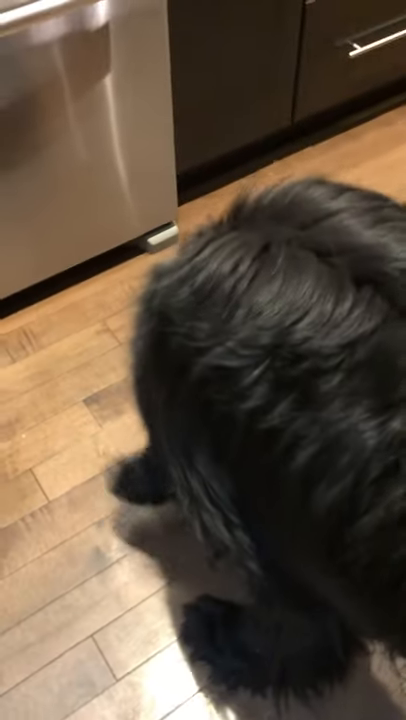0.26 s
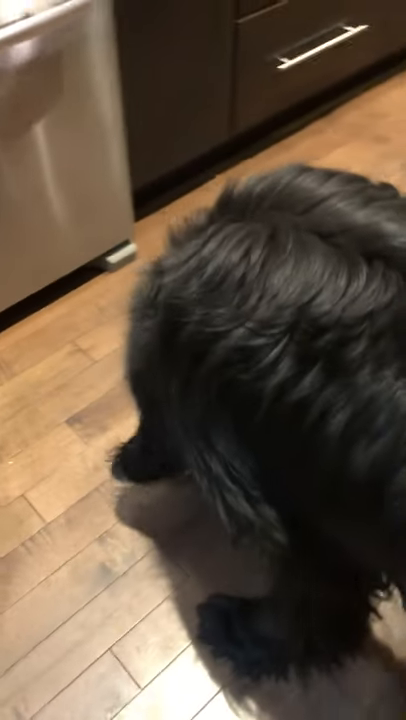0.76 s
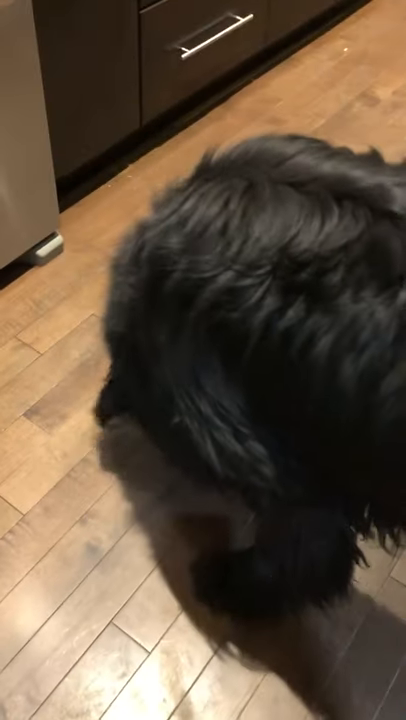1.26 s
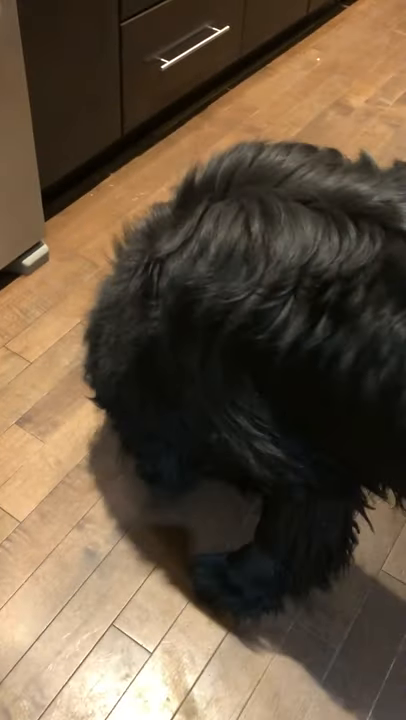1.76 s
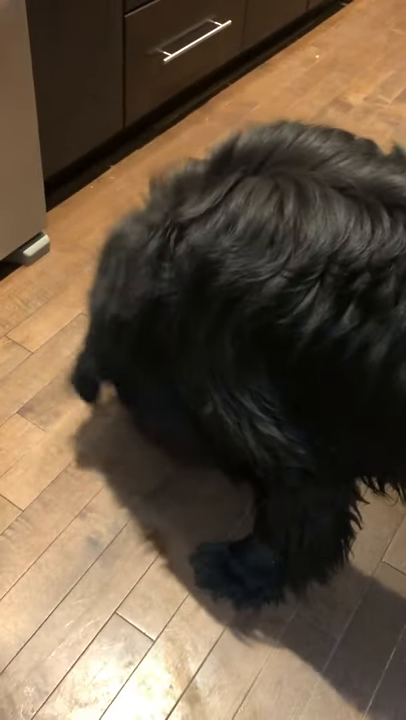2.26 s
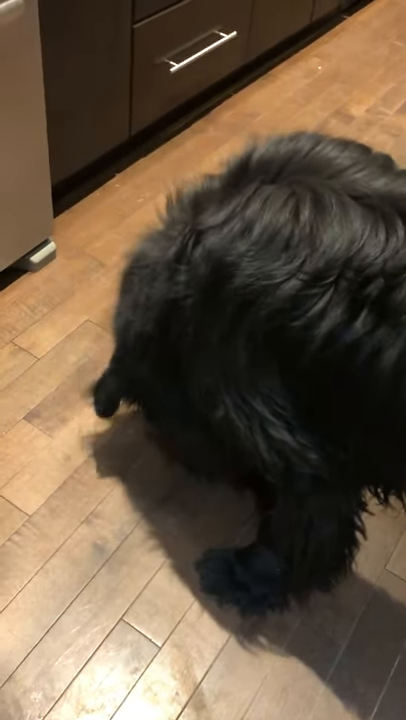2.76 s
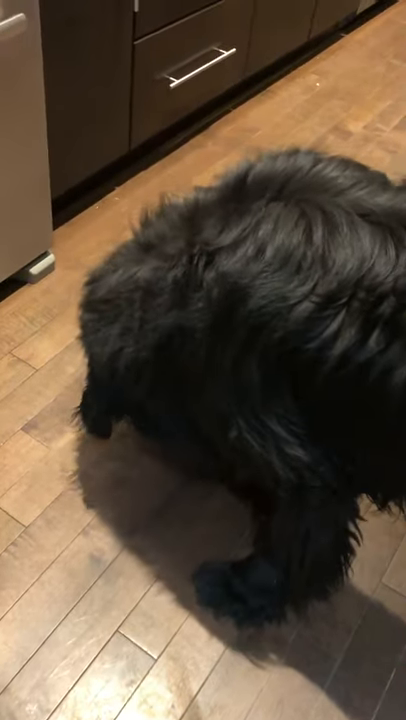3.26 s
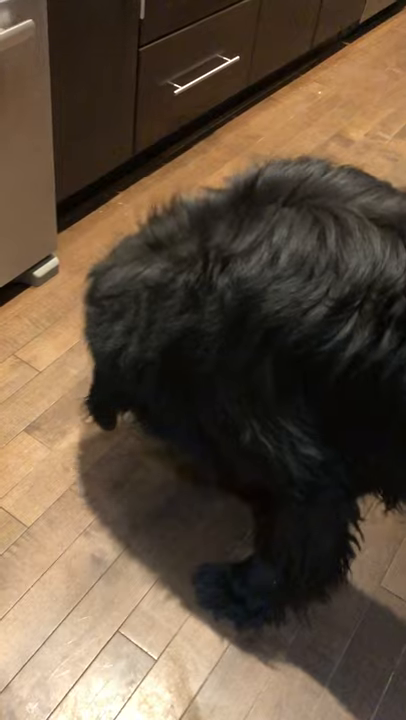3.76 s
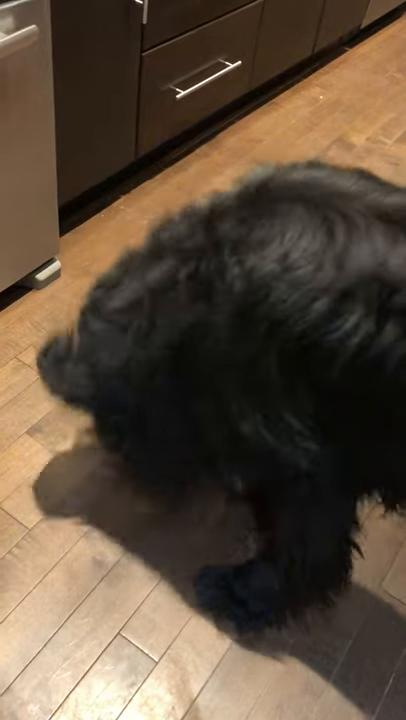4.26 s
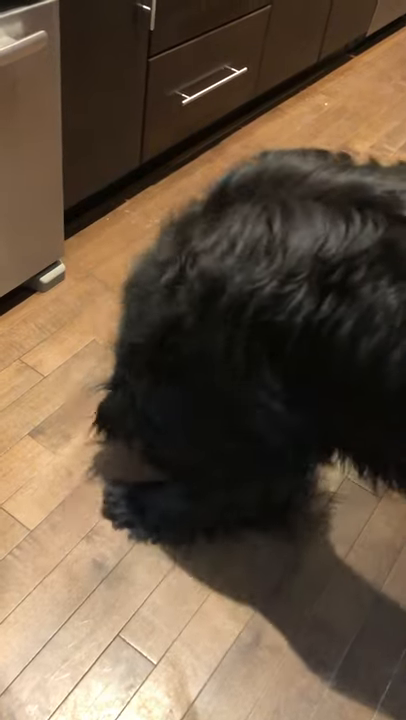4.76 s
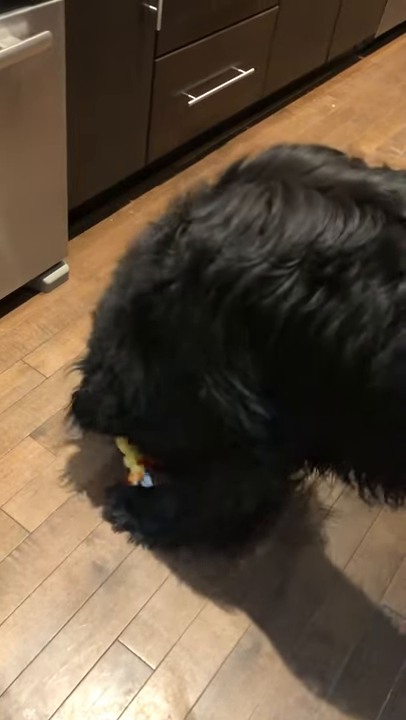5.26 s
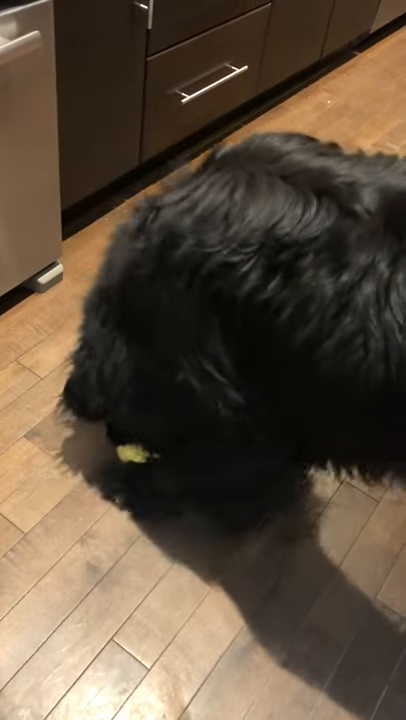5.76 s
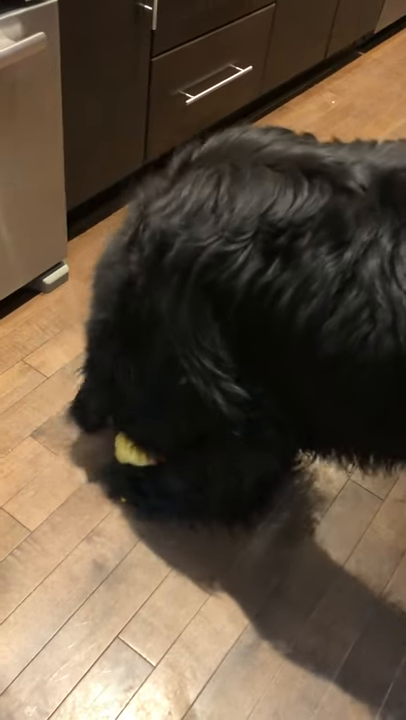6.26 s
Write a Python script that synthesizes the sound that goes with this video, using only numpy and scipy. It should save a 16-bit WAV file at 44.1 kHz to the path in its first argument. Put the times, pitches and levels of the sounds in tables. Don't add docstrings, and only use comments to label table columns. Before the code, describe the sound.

A rubber squeaker toy is worked by a dog just below the microphone on a kitchen's wooden floor. Soft swishes and bumps surround a slow squeak and a quick one, both with an inward wheeze after. Later come a solid thud, ticking claws and a very sharp tooth crack, then the hardest squeak, overblown on release, and hollow toy knocks over low fridge hum, with short bright room echo.

```python
import sys
import numpy as np
from scipy import signal
from scipy.fft import rfft, irfft, next_fast_len
from scipy.io import wavfile
from scipy.ndimage import uniform_filter1d, map_coordinates

SR = 44100
rng = np.random.default_rng(int(sys.argv[2]) if len(sys.argv) > 2 else 0)


def put_to_file(sound):
    columns = np.atleast_2d(sound).T
    safe = np.clip(columns, -1, 1)
    whole_steps = np.round(safe * 32767)
    wavfile.write(sys.argv[1], SR, whole_steps.astype(np.int16))


def voltage_ratio(level):
    return 10 ** (np.asarray(level, float) / 20)


N = 286633

# pitch_hz, level_db (per Hz)
ROOM_AIR = [(15, -54.5), (25, -21), (45, -4.5), (208, -4), (288, -12.5), (410, -12.5), (445, -9),
            (510, -17.5), (568, -15), (617, -16), (687, -16.5), (2270, -30), (3230, -33.5), (3700, -34),
            (16500, -49.5)]
ROOM_AIR_DB = -61
# pitch_hz, wander_hz, level_db
FRIDGE_TONES = [(449.6, 1.2, -66.5), (493, 6, -79.5), (3200, 9.4, -81.5), (3160, 20, -89.5)]
# pitch_hz, t60_s
KITCHEN_DECAY = [(100, 0.32), (1000, 0.74), (4000, 0.66), (8000, 0.4), (15000, 0.27)]
# pitch_hz, level_db (per Hz)
SWISH_COLOUR = [(530, -46), (900, -7), (1220, -6.5), (2660, -5.5), (3830, -5), (4220, -4), (15000, -19),
                (15900, -13.5), (16500, -33)]
# pitch_hz, level_db (per Hz)
DRAG_COLOUR = [(88, -20.5), (150, -12.5), (195, -12), (468, -11.5), (802, -23), (1500, -21.5),
               (1950, -53.5), (3300, -120)]
# start_s, strongest_s, end_s, swish_db, drag_db
FLOOR_STROKES = [(0, -0.006, 0.21, -63, -64), (0.187, 0.313, .33, -58.5, -68),
                 (.432, 0.446, 0.46, -59, -48.5), (.45, .49, 0.55, -62.5, -49.5),
                 (0.43, .53, 0.88, -58.5, -64.5), (1.12, 1.254, 1.41, -57.5, -63),
                 (1.289, 1.489, 1.6, -51, -67), (1.64, 1.707, 2.35, -68, -59.5),
                 (4.071, 4.097, 4.15, -58, -56), (4.221, 4.239, 4.35, -59.5, -54),
                 (4.328, 4.35, 4.41, -64, -59.5), (4.414, 4.424, 4.5, -63.5, -67.5),
                 (4.459, 4.51, 4.545, -58.5, -60.5), (4.54, 4.556, 6, -75, -71),
                 (4.95, 4.975, 5.04, -68, -58), (5, 5.012, 5.12, -74, -54.5)]
# start_s, peak_db, pitch_hz, t60_s
LANDINGS = [(0.21, -41, 98, 0.078), (0.481, -49, 89, 0.14), (1.295, -41.5, 86, 0.095),
            (2.04, -40.5, 118, 0.068), (3.541, -47, 99, 0.068), (3.883, -39, 144.3, 0.04),
            (3.893, -19.5, 135.5, 0.034), (4.292, -34, 107.3, 0.087), (4.346, -45, 91.5, 0.14),
            (4.647, -30, 153, 0.075), (4.66, -26.5, 99.6, 0.08), (4.74, -40, 76.8, 0.13),
            (5.792, -40, 120.3, 0.074), (5.884, -41, 115, 0.061)]
# start_s, peak_db, centre_hz
CLAW_TICKS = [(0.436, -44, 2500), (1.66, -61, 11000), (2.506, -61, 3000), (3.506, -56, 6000),
              (3.882, -47, 10970), (4.01, -63, 6000), (4.089, -42, 4500), (4.117, -44, 5000),
              (4.154, -51, 9000), (4.169, -53, 9030), (4.228, -58, 7040), (4.249, -41, 2500),
              (4.365, -51, 7000), (4.397, -52.5, 11000), (4.427, -52, 5000), (4.469, -54, 11200),
              (4.515, -55, 6960), (5.745, -52, 10000), (5.985, -55, 10420), (6.12, -60.5, 10040),
              (6.133, -60, 8990)]
# start_s, peak_db, centre_hz, spread_octaves
TOOTH_SNAPS = [(3.882, -31, 2940, .5), (3.883, -27.5, 1300, 1.07), (4.078, -40.5, 3200, 0.35),
               (4.279, -46.5, 4500, 0.44), (4.478, -42.5, 2500, 0.74), (4.492, -34, 3200, 0.77),
               (4.632, -8.5, 4500, 0.77), (4.639, -19, 4970, 1.14), (4.648, -36, 4500, 0.73),
               (5.729, -15, 3000, 0.93), (6.47, -58, 4800, .2), (6.494, -39.5, 4000, 0.32)]
# start_s, peak_db, ring_hz, t60_s
TOY_KNOCKS = [(.439, -38, 264, .03), (0.467, -46, 1310, .015), (.468, -40.5, 340, .04),
              (1.272, -41, 617, 0.052), (1.273, -46, 1514, 0.019), (1.708, -47.5, 495, 0.045),
              (2.03, -38.5, 589, 0.026), (2.051, -48, 322, 0.14), (2.11, -48.5, 330, 0.14),
              (3.534, -60, 599, 0.043), (3.89, -36, 1000, 0.084), (4.215, -46, 1200, .02),
              (4.634, -27, 1180, 0.056), (4.65, -42.5, 525, .055), (5.005, -38, 1340, .021),
              (5.006, -30.5, 605, 0.02), (5.53, -44, 603, 0.099), (5.73, -28.5, 880, 0.036),
              (5.734, -40, 448, 0.035), (5.782, -27, 485, 0.024), (5.801, -37, 340, 0.051),
              (5.868, -32, 1100, 0.019), (5.887, -37, 327, 0.15), (5.889, -40.5, 545, .038),
              (6.214, -50, 1380, 0.031)]
# start_s, peak_db, centre_hz, t60_s
BREATH_WHINES = [
    (.01, -63.5, 2040, 1.1),
    (1.381, -50.5, 3660, .59),
    (1.7, -58, 2040, 1.1),
]
# time_s, reed_pitch_hz, level_db
BITE_SQUEAKS = [
    [(.596, 1214, -43.5), (.604, 1305, -34), (.63, 1335, -30), (.68, 1362, -27.5), (.748, 1372, -24),
     (.774, 1344, -28.5), (.8, 1220, -38)],
    [(1.842, 1254, -30.5), (1.848, 1325, -29.5), (1.872, 1361, -24.5), (1.898, 1345, -25.5),
     (1.93, 1242, -31.5), (1.945, 1187, -35.5)],
    [(5.164, 1184, -42), (5.174, 1304, -29), (5.238, 1440, -27), (5.272, 1408, -27), (5.3, 1422, -23.5),
     (5.378, 1500, -21.5), (5.418, 1447, -22.5), (5.435, 1388, -29.5), (5.46, 1260, -35.5)],
]
# time_s, reed_pitch_hz, level_db
RELEASE_SQUEAKS = [
    [(.808, 1226, -38), (.83, 1469, -30), (.85, 1497, -30), (.876, 1460, -31), (.895, 1409, -30.5),
     (.908, 1322, -30), (.94, 1257, -34.5), (.97, 1182, -38), (.99, 1053, -52)],
    [(2.039, 1163, -45), (2.046, 1223, -39.5), (2.08, 1249, -36.5), (2.108, 1292, -35), (2.14, 1255, -37.5),
     (2.155, 1209, -40), (2.172, 1113, -37)],
    [(5.47, 1344, -36), (5.49, 1600, -20.5), (5.499, 2379, -25), (5.553, 2291, -25), (5.563, 1977, -21),
     (5.574, 1903, -28.5), (5.586, 1514, -24), (5.625, 1371, -30), (5.695, 1162, -41)],
]
# pitch_hz, level_db
REED_OUTWARD = [(1200, 6.5), (2700, -4.5), (4100, 0), (5500, 0.5), (7000, 2), (8500, -6.5), (11000, -12.5),
                (13500, -19), (16000, -25)]
# pitch_hz, level_db
REED_INWARD = [(1200, 10), (2700, 0), (4100, -2), (5500, 4), (7000, 0), (8500, -0.5), (11200, -2.5),
               (12200, -23.5), (16000, -15.5)]
# resonance_hz, width_hz, gain_db
TOY_CAVITY = [(7096, 910, 12), (3000, 740, 1), (7055, 2490, 15.5), (6000, 3700, 0), (5840, 2600, 15),
              (5360, 1800, 11)]
# first_partial_db, second_partial_db, third_partial_db, top_db
MOUTH_OPENING = [(-2, -5.5, -4.5, 2.5), (-2, 3.2, -0.5, 2.1), (0.6, 2, -6, 6.5), (-2.5, 1.6, 2.9, 4.5),
                 (3.2, 2.1, 0.3, -2.5), (8.5, 4.5, 4.5, 0.7)]


def unit(x):
    return x / np.sqrt(np.mean(x ** 2) + 1e-20)


def along(points, hz):
    f, v = np.transpose(points)
    return np.interp(np.log(hz + 1), np.log(f + 1), v)


def wobble(rate, size=N):
    knots = rng.standard_normal(int(size * rate / SR) + 4)
    return map_coordinates(knots, [np.arange(size) * rate / SR])


def shaped(x, gain):
    m = next_fast_len(len(x), True)
    return irfft(rfft(x, m) * gain(np.fft.rfftfreq(m, 1 / SR)), m)[:len(x)]


def noise(gain, size=N):
    return unit(shaped(rng.standard_normal(size), gain))


def add(track, s, x):
    part = track[round(s * SR):][:len(x)]
    part += x[:len(part)]


def ambience():
    level = voltage_ratio(ROOM_AIR_DB + 1.5 + 0.17 * wobble(4.1))
    out = level * noise(lambda f: voltage_ratio(along(ROOM_AIR, f)))
    for hz, wander_hz, db in FRIDGE_TONES:
        phase = 2 * np.pi * np.cumsum(hz + wander_hz * wobble(28)) / SR
        out += voltage_ratio(db + 0.5 + 1.0 * wobble(12)) * np.sin(phase)
    return out


def echoes():
    hz, t, z = signal.stft(rng.standard_normal(SR // 2), SR, nperseg=256)
    decay_db = -60 * t / along(KITCHEN_DECAY, hz)[:, None]
    near_walls_db = 1.8 * np.exp(-t / .03)
    tail = signal.istft(z * voltage_ratio(decay_db + near_walls_db), SR, nperseg=256)[1]
    tail = tail * np.minimum(np.linspace(5, 0, len(tail)), 1)
    return tail / np.linalg.norm(tail)


def kitchen(x, wet_db):
    return x + voltage_ratio(wet_db) * signal.fftconvolve(x, np.pad(echoes(), (130, 0)))[:N]


def scuffs():
    t, out = np.arange(N) / SR, np.zeros(N)
    catches = 3.0 * rng.exponential(size=N) * (rng.random(N) < .02)
    grains = voltage_ratio(catches) * voltage_ratio(1.1 * wobble(70))
    swish = unit(shaped(grains * rng.standard_normal(N), lambda f: voltage_ratio(along(SWISH_COLOUR, f))))
    drag = unit(voltage_ratio(3.72 * wobble(60)) * noise(lambda f: voltage_ratio(along(DRAG_COLOUR, f))))
    for start, peak, end, swish_db, drag_db in FLOOR_STROKES:
        span = slice(max(int(start * SR), 0), int(end * SR))
        press = np.interp(t[span], [start, peak, end], [0, 1, 0]) ** 0.99
        out[span] += press * (voltage_ratio(swish_db) * swish[span] + voltage_ratio(drag_db) * drag[span])
    return out


def thuds():
    out, t = np.zeros(N), np.arange(SR // 3) / SR
    for s, db, hz, t60 in LANDINGS:
        sagging = np.sin(2 * np.pi * hz * t * (1 - 3.8 * np.minimum(t, .1)))
        ring = sagging + 0.36 * np.sin(2 * np.pi * 1.7 * hz * t)
        add(out, s, voltage_ratio(db + 3.0 - 60 * t / t60) * (1 - np.exp(-t / 0.0053)) * ring)
    return out


def contacts():
    ticks = [(s, db, hz, 0.62, 0.015) for s, db, hz in CLAW_TICKS]
    snaps = [(*row, 0.018) for row in TOOTH_SNAPS]
    knocks = [(s, db, hz, .5 * (hz / 1000), t60) for s, db, hz, t60 in TOY_KNOCKS]
    whines = [(s, db, hz, .1, t60) for s, db, hz, t60 in BREATH_WHINES]
    return ticks + snaps + knocks + whines


def clicks():
    out, t = np.zeros(N), np.arange(SR // 4) / SR
    bounce_s, bounce = .00094, .3
    lead = SR // 50
    for s, db, hz, octaves, t60 in contacts():
        def colour(f):
            body = np.exp(-.5 * (np.log2((f + 1) / hz) / octaves) ** 2)
            return body * (1 + bounce * np.cos(2 * np.pi * f * bounce_s))

        ring = 1.2 * (hz < 1600) * np.exp(-(octaves / 1.2) ** 2) * np.sin(2 * np.pi * hz * t)
        envelope = voltage_ratio(db - 4.0 - 60 * t / t60) * (1 - np.exp(-t / 0.0005))
        crack = envelope * (0.88 * noise(colour, size=len(t)) + ring)
        tail = shaped(np.pad(echoes(), lead), lambda f: colour(f) / (1 + (f / 6000) ** 2))[lead:]
        tail_level = voltage_ratio(-4.5 - 1.2 * np.log2(hz / 1000)) * np.linalg.norm(crack)
        add(out, s, crack)
        add(out, s + .004, tail_level * tail / np.linalg.norm(tail))
    return out


def roughness(t, hz, slip, inward):
    settle_s = .012
    edges = .15 * np.exp((t[0] - t) / (2 * settle_s)) + .35 * np.exp((t - t[-1] - 1 / SR) / settle_s)
    overblown_hz = 1700
    strain = .27 * np.clip(hz / overblown_hz * 5 - 4.5, 0, 1)
    return np.clip(.02 + .1 * inward + edges + strain + slip, 0, .92)


def squeak(rows, inward, cavity, mouth):
    peak_hz, width_hz, peak_db = cavity
    first_db, second_db, third_db, top_db = mouth
    s, hz, db = np.transpose(rows)
    t = np.arange(s[0], s[-1], 1 / SR)
    k = np.arange(1, 15)[:, None]

    def smooth(v):
        return uniform_filter1d(np.interp(t, s, v), size=120, mode="nearest")

    def colour(f):
        resonance = peak_db / (1 + (2 * (f - peak_hz) / width_hz) ** 2)
        top = top_db / (1 + (6340 / (f + 1)) ** 8)
        return along(REED_INWARD if inward else REED_OUTWARD, f) + resonance + top

    glide = np.abs(np.gradient(np.log(smooth(hz)))) * SR
    slip = np.maximum(glide - 5, 0) / 90
    rough = roughness(t, smooth(hz), slip, inward)
    jitter = .001 * wobble(100, size=len(t)) + .05 * rough ** 1.3 * wobble(400, size=len(t))
    pitch = smooth(hz) * (1 + jitter)
    flutter = np.array([wobble(45.05, size=len(t)) for _ in k])
    partial_db = colour(k * pitch) + first_db * (k == 1) + second_db * (k == 2) + third_db * (k == 3)
    partial_db = partial_db - 30 * slip * (k > 1)
    level = voltage_ratio(partial_db + (3.0 + 3.7 * rough) * flutter) * (k * pitch < 16500)
    phase = 2 * np.pi * (k * np.cumsum(pitch) / SR + rng.random(k.shape))
    tone = np.sum(level * np.sin(phase), axis=0) / np.sqrt(np.sum(level ** 2, axis=0) / 2)
    hiss = noise(lambda f: voltage_ratio(colour(f)) / (1 + (2300 / (f + 1)) ** 4), size=len(t))
    fade = np.clip(np.minimum((t - s[0]) / .002, (s[-1] - t) / .008), 0, 1)
    return voltage_ratio(smooth(db)) * (np.sqrt(1 - rough ** 2) * tone + 1.1 * rough ** 1.4 * hiss) * fade


def squeaker():
    out = np.zeros(N)
    squeaks = [rows for pair in zip(BITE_SQUEAKS, RELEASE_SQUEAKS) for rows in pair]
    for i, (rows, cavity, mouth) in enumerate(zip(squeaks, TOY_CAVITY, MOUTH_OPENING)):
        add(out, rows[0][0], squeak(rows, i % 2, cavity, mouth))
    return out


def scene():
    floor = kitchen(scuffs(), wet_db=-8.5) + kitchen(thuds(), wet_db=-2.0)
    toy = clicks() + kitchen(squeaker(), wet_db=-6.0)
    return (ambience() + floor + toy)[None]


def low_pass(x):
    return signal.sosfilt(signal.butter(12, 16820, fs=SR, output="sos"), x)


def record(dry):
    def band(f):
        return np.clip((16400 - f) / 600, .006, 1) / (1 + (34 / (f + 1)) ** 8)

    mix = shaped(dry[0], band)[None]
    return low_pass(mix)


dry = scene()
out = record(dry)
put_to_file(out)
```